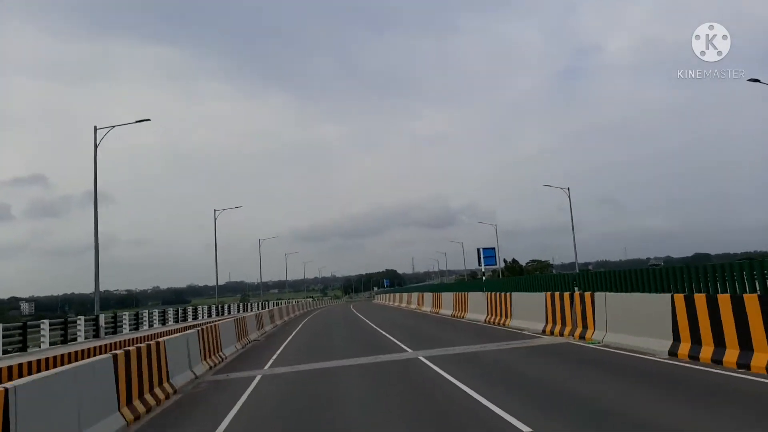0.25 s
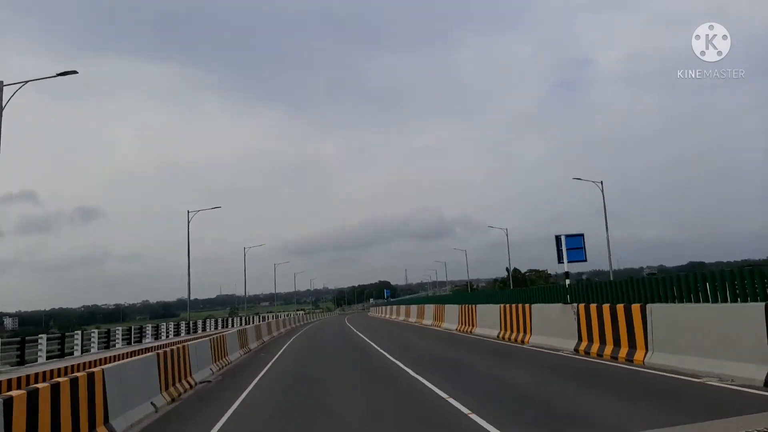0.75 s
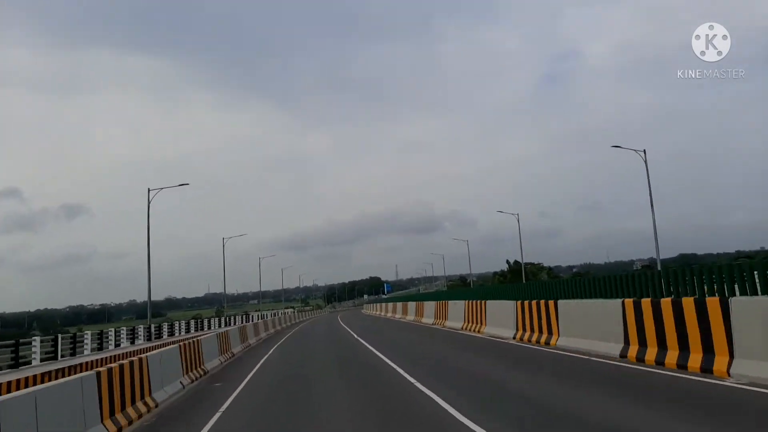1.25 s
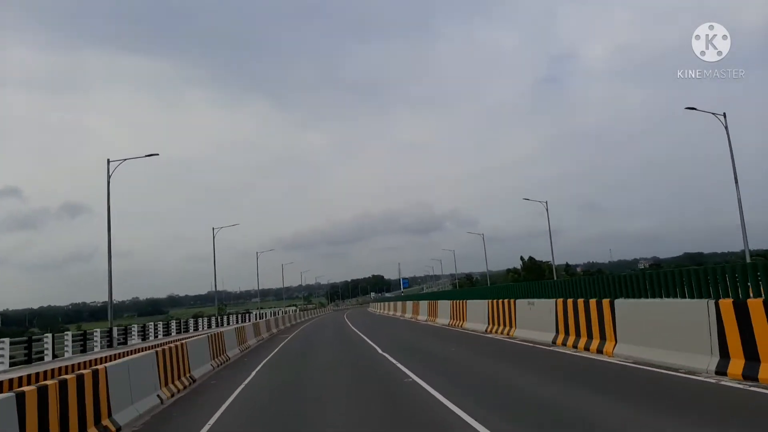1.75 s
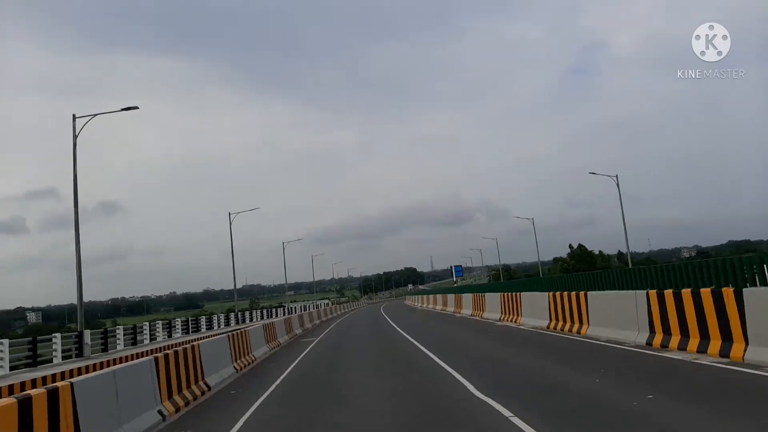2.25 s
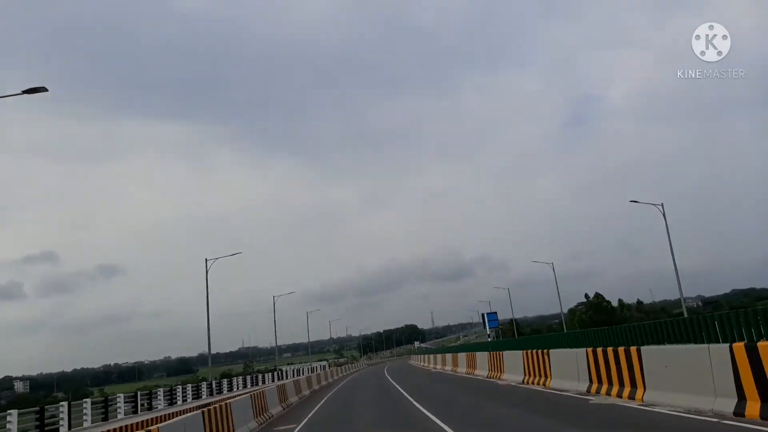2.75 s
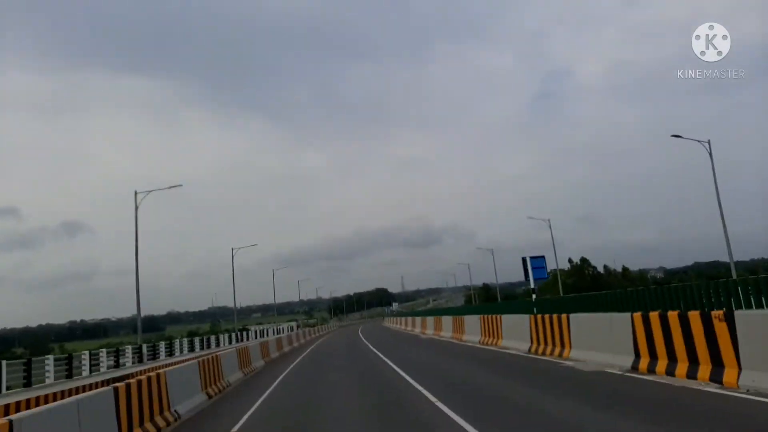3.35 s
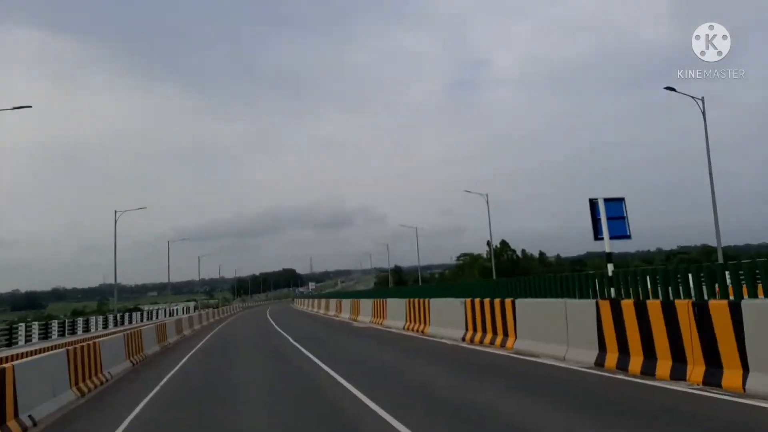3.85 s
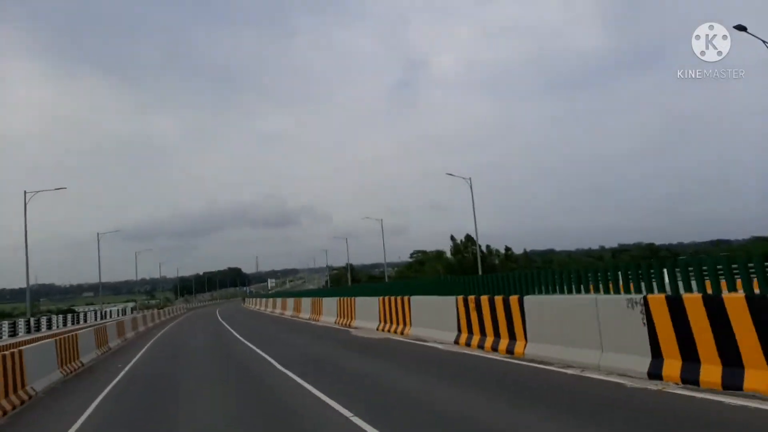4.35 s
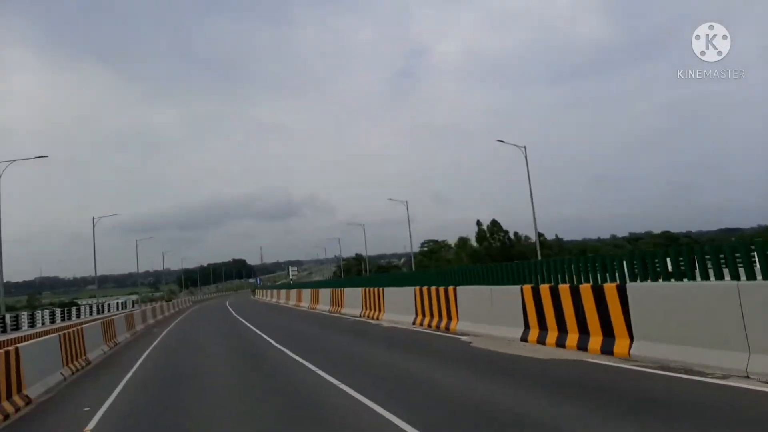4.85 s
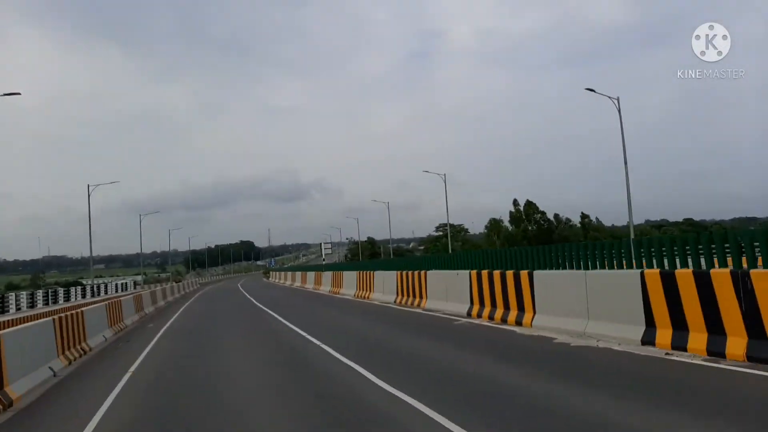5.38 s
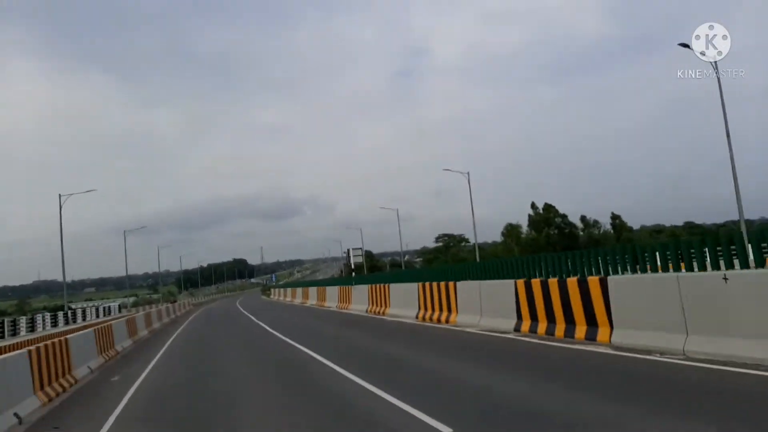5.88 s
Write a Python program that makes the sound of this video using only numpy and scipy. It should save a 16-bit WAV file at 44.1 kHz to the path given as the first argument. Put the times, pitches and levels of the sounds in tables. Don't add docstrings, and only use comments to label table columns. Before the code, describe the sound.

Lumpy gusts and road hiss on a moving vehicle grow abruptly into rough, overloaded wind roar, with pops and hissing air jets on the left.

```python
import sys
import numpy as np
from scipy import signal
from scipy.fft import rfft, irfft, dct, next_fast_len
from scipy.io import wavfile
from scipy.ndimage import uniform_filter1d, map_coordinates

SR = 44100
rng = np.random.default_rng(int(sys.argv[2]) if len(sys.argv) > 2 else 0)


def wav_record(signal):
    frames = np.transpose(np.atleast_2d(signal))
    bounded = np.clip(frames, -1, 1)
    quanta = np.round(bounded * 32767).astype(np.int16)
    wavfile.write(sys.argv[1], SR, quanta)


def how_loud(loudness_db):
    steps = np.asarray(loudness_db, float) / 20
    return 10 ** steps


N = 269892
HOP = 20


def unit(x):
    return x / np.sqrt(np.mean(x ** 2) + 1e-20)


def even(x, span_s):
    size = int(span_s * SR)
    power = uniform_filter1d(uniform_filter1d(x ** 2, size), size)
    return unit(x / np.sqrt(np.abs(power) + 1e-12))


def curves(rows):
    s, *columns = np.transpose(rows)
    return np.array([np.interp(np.arange(N) / SR, s, c) for c in columns])


def swells(rows, rise_db_s, fall_db_s, rest_db):
    start_s, hold_s, *peak_db = np.transpose(rows)[..., None]
    t = np.arange(N // HOP + 1) * HOP / SR
    before_s = np.clip(start_s - t, 0, None)
    after_s = np.clip(t - start_s - hold_s, 0, None)
    under_db = rise_db_s * before_s + fall_db_s * after_s
    power = (how_loud(np.array(peak_db) - under_db) ** 2).sum(axis=1) + how_loud(rest_db) ** 2
    return np.repeat(10 * np.log10(power), HOP, axis=1)[:, :N]


def wobble(rate_hz):
    at = np.arange(N // HOP + 2) * HOP * min(rate_hz, 600) / SR
    knots = rng.standard_normal((3, 4000))
    return [2 * np.tanh(map_coordinates(k, [at]) / 2) for k in knots]


def flutter(rate_hz, both_db, own_db):
    both, left, right = wobble(rate_hz)
    shake_db = both_db * both + own_db * np.array([left, right])
    return np.repeat(shake_db, HOP, axis=1)[:, :N]


def filtered(x, response):
    m = next_fast_len(N + SR // 2)
    return irfft(rfft(x, m) * response(np.fft.rfftfreq(m, 1 / SR)), m)[..., :N]


def colour(points):
    f, db = np.transpose(points)
    return lambda hz: how_loud(np.interp(np.log(hz + 1), np.log(f), db))


def air(patchy_db):
    z = signal.stft(rng.standard_normal((2, N)), nperseg=512)[2]
    field = uniform_filter1d(rng.standard_normal(z.shape[1:]), size=6, axis=0)
    field = uniform_filter1d(field, size=8, axis=1)
    return signal.istft(z * how_loud(patchy_db * unit(field)), nperseg=512)[1][:, :N]


# centre in Hz, width in Hz, level in dB.
PORT_MODES = [
    (557, 270, -2.5),
    (1139, 512, 1),
    (1708, 1013, -5),
]


def cavity(hz):
    modes = 0
    for k, (centre_hz, width_hz, db) in enumerate(PORT_MODES):
        damping = 1j * hz * width_hz
        modes = modes + (-1) ** k * how_loud(db) * damping / (centre_hz ** 2 - hz ** 2 + damping)
    mesh = hz / 3770
    return modes / (1 + 1.3j * mesh - mesh ** 2) ** 2


# start in seconds, hold in seconds, left in dB, right in dB.
GUSTS = [(0, 0.0063, -24.5, -28.5), (.27, 0.096, -26.5, -30.5), (.41, 0.0032, -28, -25),
         (.53, 0.069, -23.5, -25.5), (.75, 0.037, -26, -29.5), (1.04, 0.052, -33.5, -37),
         (1.2, 0.013, -28, -33), (1.35, .03, -25, -28.5), (1.54, 0.011, -23.5, -31),
         (1.67, 0.011, -26.5, -29), (1.78, 0.084, -26, -31.5), (2.145, 0.15, -18.5, -17),
         (2.41, 0.41, -17.5, -17.5), (2.9, 0.26, -18, -16.5), (3.29, 0.042, -17.5, -17),
         (3.51, .09, -17.5, -20), (3.68, 0.051, -14.5, -16), (3.83, 0.035, -20.5, -20.5),
         (3.97, 0.21, -15.5, -17), (4.29, 0.15, -18.5, -21), (4.62, 0.091, -17, -13.5),
         (4.76, 0.014, -16, -19.5), (4.86, 0.013, -17, -21.5), (5.02, 0.01, -12, -14),
         (5.1, 0.12, -16.5, -17.5), (5.37, 0.15, -17.5, -20), (5.585, 0.041, -13.5, -12),
         (5.69, 0.078, -17.5, -19.5), (5.965, .01, -14.5, -16.5), (6.09, .03, -17.5, -22)]
# time in seconds, tearing over the roar in dB, lean to the left in dB.
SLANT = [(0, -8.5, -10.5), (.3, -3.5, 0.5), (.6, -6.5, -3), (1.2, -6, -4), (2.07, -2.5, -1.5),
         (2.2, -15.5, -2), (2.45, -19, -9.5), (3.15, -29, -3), (3.33, -7.5, 2), (3.8, -6, 1.5),
         (4.05, -6, 4), (4.36, -6, 12), (4.6, -4, 9.5), (4.9, -6.5, 10), (5.2, -15.5, 1.5),
         (5.4, -14.5, 15), (5.7, -16, 10), (6.12, -13.5, 8)]
# frequency in Hz, gain in dB.
EDGE_COLOUR = [(800, -62), (1600, 1.5), (2200, 2.5), (3500, -5.5), (5000, -14), (6800, -22.5),
               (8500, -36.5), (12000, -26.5), (16500, -54)]


def gusts():
    gust_db = swells(GUSTS, rise_db_s=162, fall_db_s=214, rest_db=[[-29], [-36.5]])
    over_db, lean_db = curves(SLANT)
    pivot_db = -19.5
    tear_db = pivot_db + 0.61 * (gust_db - pivot_db)
    tear_db = tear_db + over_db + np.array([lean_db, -lean_db]) / 2
    bursts_db = flutter(45, both_db=1.0, own_db=2.5)
    roar_db = bursts_db + flutter(300, both_db=0.5, own_db=4.5)
    roar = filtered(how_loud(roar_db) * air(patchy_db=2.1), cavity)
    rip_db = 0.88 * bursts_db + flutter(90, both_db=-1.3, own_db=6.5)
    rip = filtered(how_loud(rip_db) * air(patchy_db=2.66), colour(EDGE_COLOUR))
    return how_loud(gust_db) * even(roar, span_s=0.063) + how_loud(tear_db) * even(rip, span_s=0.073)


# time in seconds, half length in seconds, depth in dB.
STALLS = [
    (3.38, 0.0098, 5),
    (3.435, 0.02, 6),
    (3.882, 0.011, 10),
    (4.17, 0.0096, 14),
    (4.246, 0.011, 9),
    (4.381, .004, 10),
    (4.44, 0.0078, 11),
    (4.641, 0.0052, 5),
    (4.693, 0.024, 7.5),
    (4.834, 0.0067, 3),
]


def stalls():
    t = np.arange(N) / SR
    dip_db = sum(db * np.exp(-((t - s) / half_s) ** 4) for s, half_s, db in STALLS)
    return how_loud(-dip_db * np.array([[1], [.2]]))


# start in seconds, hold in seconds, left in dB, right in dB.
SHOVES = [(0, .005, -27, -21.5), (.1, 0.13, -30.5, -29), (.42, 0.088, -21.5, -24), (.6, 0.17, -22, -23.5),
          (.86, 0.18, -28.5, -26), (1.18, 0.07, -23.5, -22), (1.44, 0.0038, -21, -19.5),
          (1.54, 0.0044, -18, -20.5), (1.74, .005, -25, -33), (1.8, 0.15, -24.5, -27.5),
          (1.97, 0.1, -30, -24.5), (2.17, 0.06, -21, -37), (2.37, 0.065, -22, -32),
          (2.45, 0.16, -25.5, -44), (2.72, 0.068, -21.5, -23.5), (3.03, 0.038, -21, -22),
          (3.26, .17, -25.5, -26), (3.6, .12, -28, -24.5), (3.95, .03, -23.5, -22.5),
          (4.05, 0.16, -29, -26.5), (4.32, .3, -46, -27), (4.43, .005, -33, -34), (4.81, 0.0064, -28, -22),
          (5.05, 0.14, -30.5, -28), (5.35, 0.0044, -34, -21.5), (5.54, 0.049, -38, -23),
          (5.67, 0.0043, -33, -32), (5.76, 0.066, -49, -30.5), (5.99, 0.0055, -39, -22),
          (6.1, .02, -42, -25)]
# start in seconds, hold in seconds, level in dB.
JOLTS = [(.5, 0.21, -27), (.88, 0.013, -32), (1.43, .01, -28), (1.54, 0.016, -23.5), (1.69, 0.0065, -26),
         (1.78, 0.11, -30.5), (2.2, 0.75, -26), (2.72, 0.015, -28), (3.04, 0.025, -20),
         (3.36, 0.015, -21.5), (3.62, .03, -21.5), (3.93, 0.27, -25.5), (4.31, 0.092, -26),
         (4.6, 0.011, -23.5), (4.76, 0.091, -24.5), (5.3, 0.25, -25.5), (5.8, 0.04, -33),
         (6.0, 0.073, -22.5)]
# frequency in Hz, gain in dB.
PUSH_COLOUR = [(20, -10.5), (40, -15.5), (60, -4.5), (95, 1), (140, -3), (200, -9), (300, -25), (500, -41),
               (900, -120)]
# frequency in Hz, gain in dB.
DRUM_COLOUR = [(60, -120), (130, -5.5), (200, -5.5), (300, 1), (360, -2.5), (450, -8), (700, -13.5),
               (1500, -120)]


def buffet():
    push_db = swells(SHOVES, rise_db_s=128, fall_db_s=152, rest_db=-37)
    drum_db = swells(JOLTS, rise_db_s=122, fall_db_s=86.5, rest_db=-29.5)
    lumps_db = flutter(22, both_db=-0.5, own_db=1) + flutter(60, both_db=5.0, own_db=3.0)
    push = filtered(how_loud(lumps_db) * air(patchy_db=1.26), colour(PUSH_COLOUR))
    beat_db = 0.69 * lumps_db + flutter(24, both_db=3.0, own_db=-0.2)
    drum = filtered(how_loud(beat_db) * air(patchy_db=-0.95), colour(DRUM_COLOUR))
    return how_loud(push_db) * even(push, span_s=0.12) + how_loud(drum_db) * even(drum, span_s=0.099)


# start in seconds, end in seconds, level at start in dB, level at end in dB.
JETS = [(3.97, 3.99, -51, -51), (4.02, 4.086, -35.5, -44), (4.324, 4.38, -36.5, -35.5),
        (4.383, 4.42, -27, -49), (4.45, 4.464, -38, -38), (4.463, 4.629, -36, -33.5),
        (4.64, 4.65, -51, -46), (4.732, 4.767, -46, -31), (4.842, 5.028, -30.5, -32.5),
        (5.353, 5.469, -46, -44), (5.487, 5.525, -38, -37), (6.052, 6.08, -38, -53)]
# frequency in Hz, gain in dB.
JET_COLOUR = [(1500, -16), (3500, 12), (5000, 8.5), (6500, 2), (8500, -8), (10500, -5), (13000, -3),
              (16500, -16)]


def jets():
    level, t = np.zeros(N), np.arange(N) / SR
    for start_s, end_s, start_db, end_db in JETS:
        blowing = (t > start_s) & (t < end_s)
        level += blowing * how_loud(np.interp(t, [start_s, end_s], [start_db, end_db]))
    shake_db = flutter(60, both_db=-2.0, own_db=3.0)
    hiss = filtered(how_loud(shake_db) * air(patchy_db=1.5), colour(JET_COLOUR))
    return uniform_filter1d(level, size=130) * unit(hiss) * how_loud([[8.5], [-15]])


# time in seconds, peak in dB, brightness in dB, left minus right in dB.
POPS = [(0.257, -15, -12, 2), (0.411, -7.5, -32, 8), (2.923, -5.5, -26, 0.5), (3.356, -2.5, -19.5, 5.5),
        (3.392, -14, -18, -2), (3.408, -15.5, -22, 3), (3.509, -5.5, -39, 3), (3.557, -11, -25, -2),
        (3.65, -13.5, -26, -11), (3.678, -11, -26, -6), (3.7, -20, -29, -5), (3.901, -16, -23, -3),
        (3.937, -7.5, -26, 1), (3.995, -6.5, -33, 1), (5.023, -4.5, -27, -12.5)]


def crack_colour(hz):
    return colour(JET_COLOUR)(hz) / (1 + hz / 3000) * 2.2


def pops():
    blow, crack, suck = np.zeros((3, 2, N))
    t = np.arange(600) / SR
    swell = t / 0.0017 * np.exp(1 - t / 0.0017)
    snap = np.exp(-((t - .0034) / 0.001) ** 2)
    pull = np.exp(-((t - .003) / 0.00049) ** 2)
    for s, db, bright_db, pan_db in POPS:
        side = how_loud(db + np.array([[pan_db], [-pan_db]]) / 2)
        first = round(s * SR)
        at = slice(first, first + len(t))
        coarse = np.repeat(np.sign(rng.standard_normal((2, 50))), 12, axis=1)
        fine = np.sign(rng.standard_normal((2, len(t))))
        blow[:, at] += side * swell * coarse
        suck[:, at] -= side * pull
        crack[:, at] += side * how_loud(bright_db) * snap * fine
    ring = how_loud(2.0) * filtered(blow, cavity)
    cracks = how_loud(7.0) * filtered(crack, crack_colour) * how_loud([[1.5], [-12]])
    return ring + how_loud(-6.5) * suck + cracks


# time in seconds, level of its top octave in dB.
ROAD = [(0.0, -43.5), (0.94, -42.5), (1.34, -45), (1.45, -42), (1.97, -43.5), (2.1, -41.5), (2.87, -44),
        (3.0, -43.5), (3.58, -49.5), (3.72, -45), (3.88, -47.5), (4.28, -47), (4.62, -41.5), (4.7, -46.5),
        (5.0, -43.5), (5.2, -49), (5.43, -46), (6.12, -48.5)]
# frequency in Hz, gain in dB.
TYRE_COLOUR = [(150, -67), (400, 20.5), (700, 18.5), (1350, 27), (1800, 21), (2500, 14.5), (5000, 9.5),
               (6800, 6.5), (8500, -9), (10000, -2.5), (12500, 1.5), (15000, 0), (16500, -3)]


def road():
    shake_db = flutter(20, both_db=-0.67, own_db=1.94)
    hiss = filtered(how_loud(shake_db) * air(patchy_db=2.25), colour(TYRE_COLOUR))
    top = filtered(hiss, lambda hz: hz > 9500)
    return how_loud(curves(ROAD) - 0.8) * hiss / np.std(top)


def scene():
    return stalls() * (gusts() + jets()) + buffet() + pops() + road()


# frequency in Hz, step over band level in dB.
STEPS = [(200, -24), (1000, -17), (2500, -11), (4300, -5), (6500, -2), (7500, 5), (8200, 10), (9800, 9),
         (11000, 4), (14500, 3), (15500, 15)]


def drop_weak_cells(x, scatter_db, crest, follow, cling):
    m, lead = 1024, 1024 - 730
    count = N // m + 2
    rise = np.sin(np.pi * (np.arange(m) + .5) / (2 * m))
    steep = uniform_filter1d(rng.standard_normal(count + 1), size=4) > -.08
    rise = np.where(steep[:, None], np.sin(np.pi / 2 * rise ** 2), rise)
    window = np.concatenate([rise[:-1], rise[1:, ::-1]], axis=1)
    blocks = np.pad(x, ((0, 0), (lead, (count + 1) * m - lead - N))).reshape(2, -1, m)
    frames = np.concatenate([blocks[:, :-1], blocks[:, 1:]], axis=2) * window
    a, b, c, d = np.split(frames, 4, axis=2)
    folded = np.concatenate([-c[..., ::-1] - d, a - b[..., ::-1]], axis=2)
    lines = dct(folded, type=4, norm="ortho")

    bands = np.sqrt((lines ** 2).reshape(2, count, -1, 32).mean(axis=3) + 1e-16)
    bands = bands ** .65 * bands.max(axis=0) ** .35
    usual = np.median(bands, axis=(0, 1))
    bands = usual * (bands / usual) ** cling
    loudness = lines.std(axis=(0, 2))[:, None] + 1e-9
    bands = bands * (loudness / np.median(loudness)) ** follow
    bands = bands * how_loud(scatter_db * rng.standard_normal(bands.shape))
    step = np.repeat(bands, 32, axis=2) * colour(STEPS)(np.arange(m) * SR / (2 * m))
    rounded = np.sign(lines) * np.floor(np.abs(lines) / step + .4) * step

    slope = np.diff(frames, n=2, axis=2)
    sudden = np.abs(slope).max(axis=(0, 2)) > crest * slope.std(axis=(0, 2))
    kept = np.where(sudden[:, None], lines, rounded)
    p, q = np.split(dct(kept, type=4, norm="ortho"), 2, axis=2)
    out = np.zeros_like(blocks)
    out[:, :-1] += np.concatenate([q, -q[..., ::-1]], axis=2) * window[:, :m]
    out[:, 1:] += np.concatenate([-p[..., ::-1], -p], axis=2) * window[:, m:]
    return out.reshape(2, -1)[:, lead:lead + N]


def roll_off(x):
    return signal.sosfilt(signal.butter(12, 15800, fs=SR, output="sos"), x)


def record(dry):
    x = dry / (1 + np.abs(dry / .98) ** 6) ** (1 / 6)
    left, right = filtered(x, lambda hz: 1 / (1 + (hz / 15900) ** 60))
    mid_side = np.array([left + right, left - right]) / 2
    mid, side = drop_weak_cells(mid_side, scatter_db=1.5, crest=9, follow=.3, cling=.6)
    return roll_off(np.array([mid + side, mid - side]))


dry = scene()
out = record(dry)
wav_record(out)
```